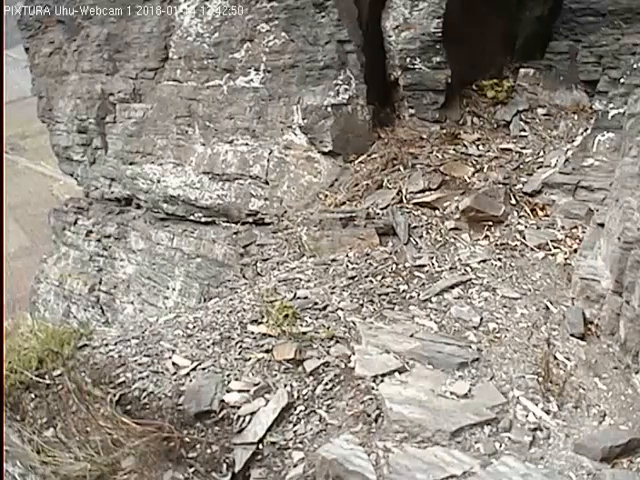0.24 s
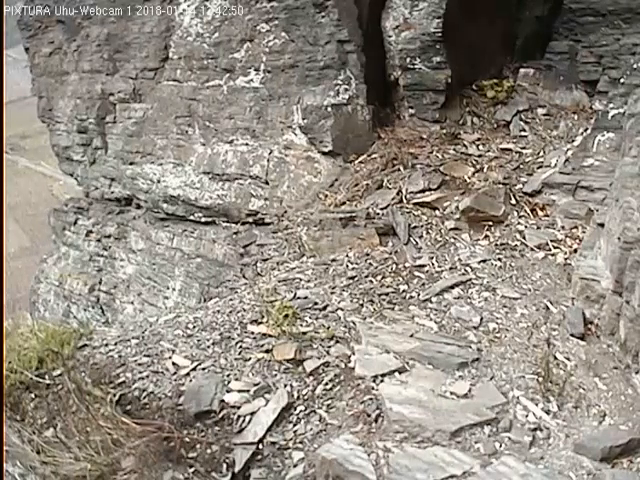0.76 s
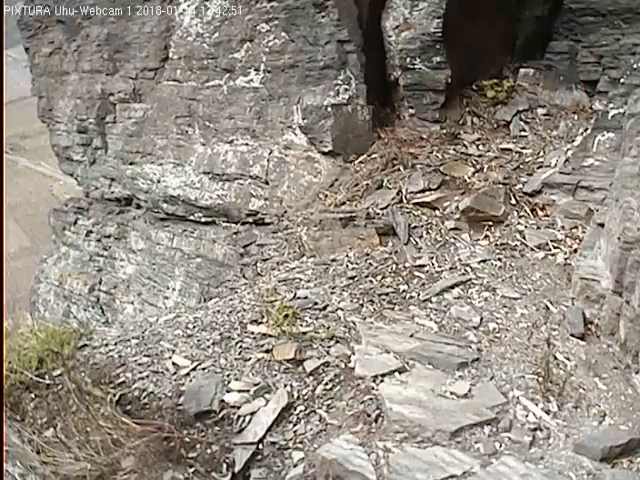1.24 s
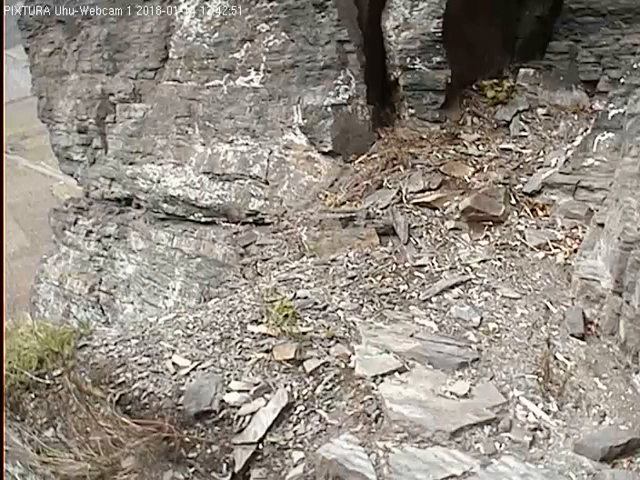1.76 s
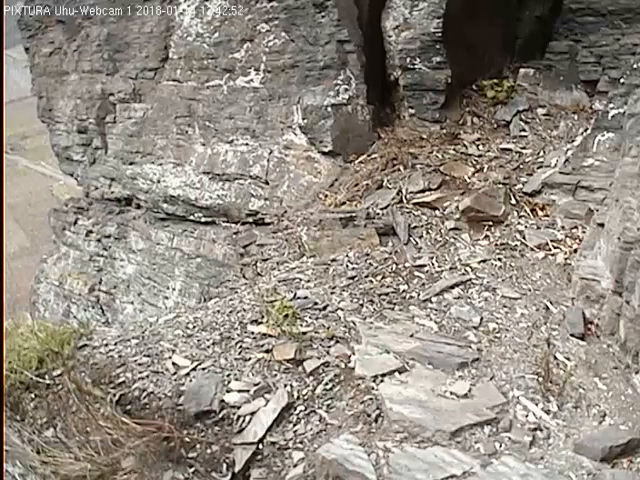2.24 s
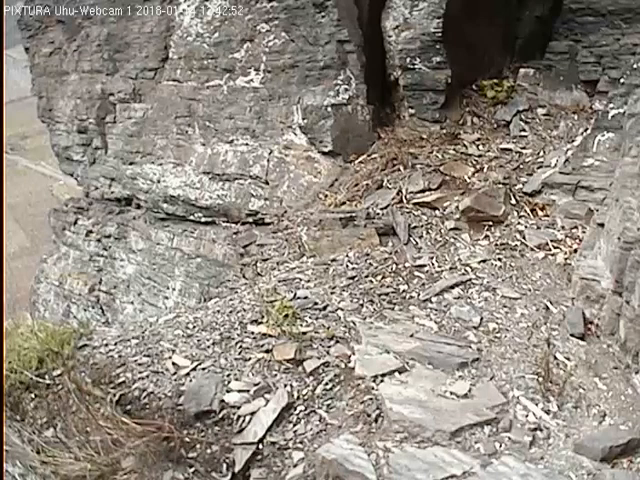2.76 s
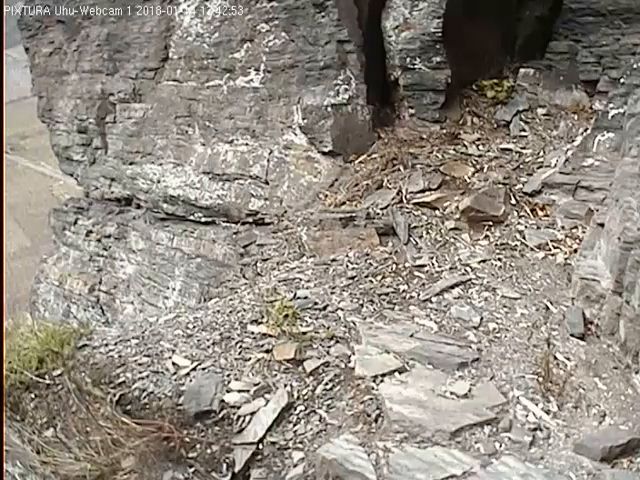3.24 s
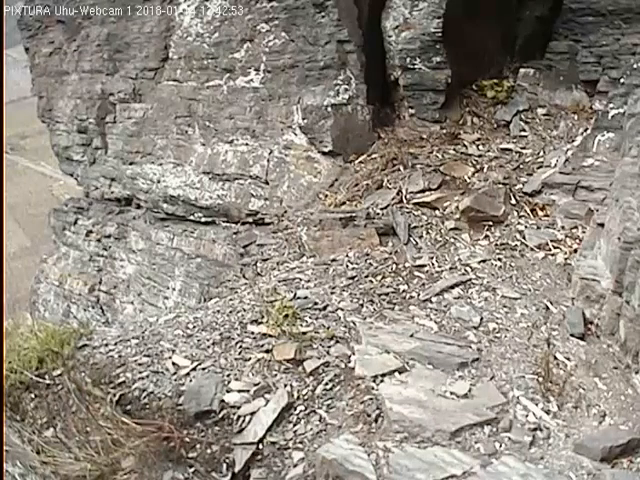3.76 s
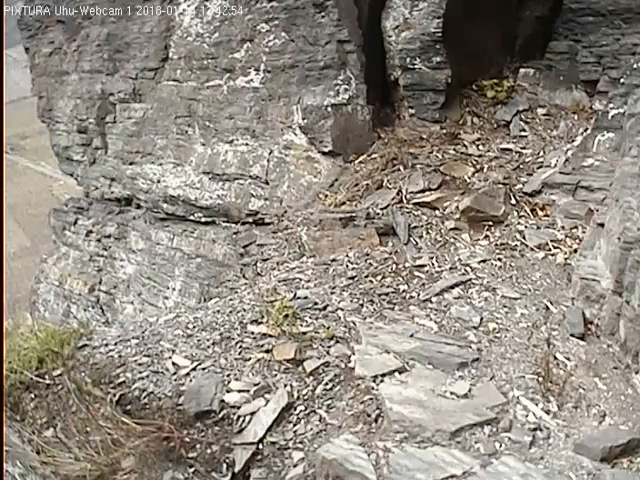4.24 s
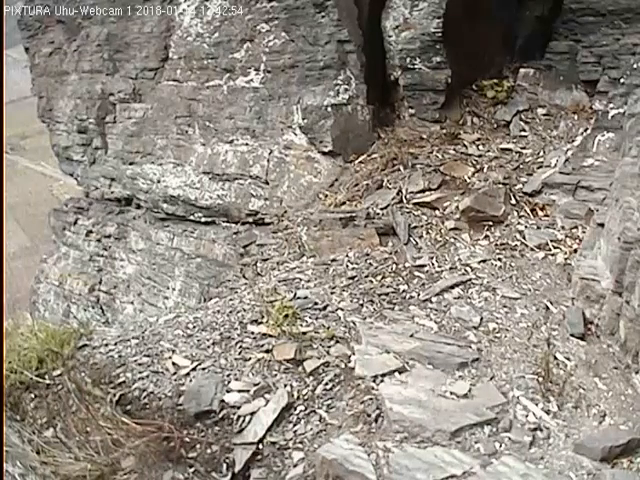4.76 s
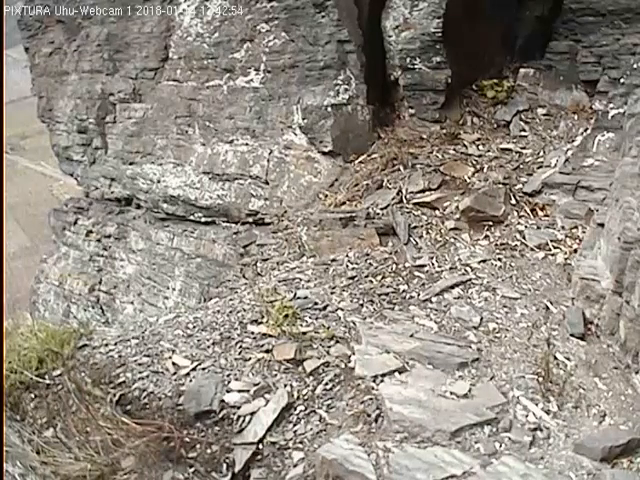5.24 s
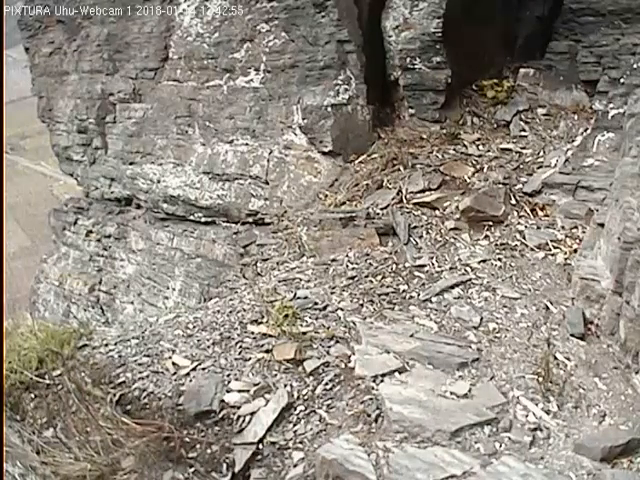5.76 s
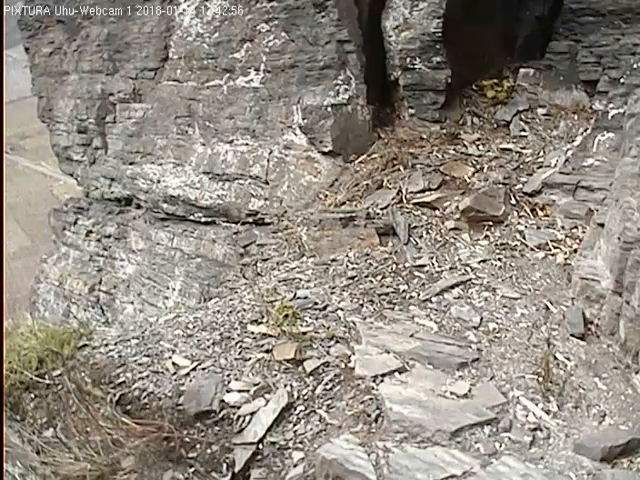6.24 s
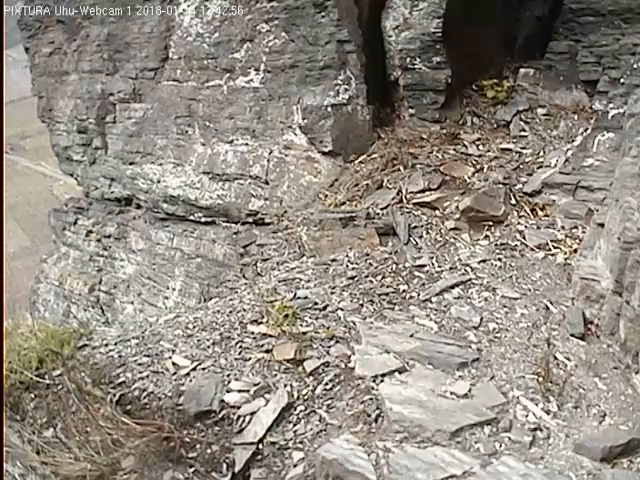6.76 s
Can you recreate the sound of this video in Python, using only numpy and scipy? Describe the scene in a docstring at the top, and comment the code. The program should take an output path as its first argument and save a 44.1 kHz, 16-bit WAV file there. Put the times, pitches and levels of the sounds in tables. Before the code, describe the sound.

A falcon gives ten harsh, rasping alarm cries beside a cliff, swelling to a loud middle then fading, over faint valley rumble and breeze.

```python
"""Ten harsh falcon alarm cries ring out by a cliff ledge, swelling and fading, each building to a last push.
Each call is a whistle near 1.1 kHz, usually strongest in its octave, with sum and difference tones
from a slower flutter of the syrinx and noise for the rasping air.
Filtered, delayed echoes come off the rock, sooner and higher in pitch as the bird flies towards it.
Shaped noise makes the valley's rumble, breeze and gust; a camera adds hum and a thin digital edge."""
import sys
import numpy as np
from scipy import signal
from scipy.fft import rfft, irfft, next_fast_len
from scipy.io import wavfile
from scipy.ndimage import map_coordinates

SR = 44100
rng = np.random.default_rng(int(sys.argv[2]) if len(sys.argv) > 2 else 0)


def unload_wav(signal):
    """Save mono or channel-first audio to the path in sys.argv[1] as 16-bit WAV at rate SR, clipped to [-1, 1]."""
    wavfile.write(
        sys.argv[1],
        SR,
        np.round(np.clip(np.atleast_2d(signal).T, -1, 1) * 32767).astype(np.int16),
    )


N = 308743
T = np.arange(N) / SR  # time line [s]


def from_db(db):
    """Decibels to gain."""
    return 10 ** (np.asarray(db) / 20)


def rms_one(x):
    """Scale to unit power."""
    return x / np.sqrt(np.mean(x ** 2) + 1e-20)


def in_time(rows, t):
    """Read each column of a curve table at the times t."""
    s, *columns = np.transpose(rows)
    return [np.interp(t, s, column) for column in columns]


def bumps(rows, t):
    """Sum of bell-shaped swells given as (centre [s], half length to 1/e [s], height)."""
    return sum(height * np.exp(-((t - s) / width) ** 2) for s, width, height in rows)


def coloured_noise(spectrum, size):
    """Noise of unit power whose spectrum follows points of (frequency [Hz], relative level [dB])."""
    hz, db = np.transpose(spectrum)
    padded = next_fast_len(size, True)
    bins = np.fft.rfftfreq(padded, 1 / SR) + 1e-3
    gain = from_db(np.interp(np.log(bins), np.log(hz), db, left=-120, right=-120))
    noise = irfft(rfft(rng.standard_normal(padded)) * gain, padded)
    return rms_one(noise[:size])


def drift(rate_hz, size):
    """Smooth random wander of spread 1: low-passed noise drawn at every 20th sample."""
    r = np.exp(-2 * np.pi * rate_hz * 20 / SR)
    noise = rng.standard_normal(size // 20 + 2002)
    slow = signal.lfilter([1], [1, -2 * r, r * r], noise)[2000:]  # drop the filter's start-up
    return np.interp(np.arange(size) / 20, np.arange(len(slow)), rms_one(slow))


def cycles(hz):
    """Running phase of an oscillator [radians]."""
    return 2 * np.pi * np.cumsum(hz) / SR


def valley():
    """Steady distant rumble and hiss: noise weighted towards the bass."""
    # Valley and microphone colour: (frequency [Hz], relative level [dB])
    valley_colour = [(22, -54.5), (48, 1.5), (75, -7), (115, -9), (200, -11), (330, -10), (450, -6.5),
                     (560, -18), (950, -12), (1500, -18), (3100, -34), (5000, -29), (8000, -31.5),
                     (8900, -108)]
    return from_db(-53) * coloured_noise(valley_colour, N)


def breeze():
    """Air moving along the cliff: mid-range noise that rises and sinks."""
    # Breeze strength: (time [s], level [dB])
    breeze_level = [(0, -57.5), (1.5, -53), (4, -52), (4.9, -54), (5.6, -59.5), (7, -61.5)]
    # Breeze colour: (frequency [Hz], relative level [dB])
    breeze_colour = [(200, -14), (450, 1), (1000, 4), (1600, 2.5), (2400, 0.5), (4000, -10), (8000, -25)]
    return from_db(in_time(breeze_level, T)[0]) * coloured_noise(breeze_colour, N)


def gust():
    """A soft gust on the microphone: a low thrum of noise."""
    # Gust strength: (time [s], level [dB])
    gust_level = [(0, -74), (4.85, -60.5), (5.05, -57), (5.3, -54.5), (5.55, -62), (7, -78)]
    # Gust colour: (frequency [Hz], relative level [dB])
    gust_colour = [(30, -14), (52, 12.5), (68, 19), (100, -11.5)]
    return from_db(in_time(gust_level, T)[0]) * coloured_noise(gust_colour, N)


def hum(waver_db=1.0, waver_hz=0.26):
    """Mains hum: sine lines that waver slightly in level and pitch under one shared swell."""
    # Hum lines: (frequency [Hz], level [dB])
    hum_lines = [(50, -69), (99.5, -62.5), (149.8, -57.5), (250, -73.5)]
    # Shared swell, used about its mean: (time [s], level [dB])
    hum_swell = [(0, -56), (1, -53.5), (1.21, -62), (1.5, -54), (4.5, -54.5), (5.15, -57), (5.7, -54),
                 (7, -52)]
    swell, = in_time(hum_swell, T)
    swell = swell - swell.mean()
    out = np.zeros(N)
    for hz, db in hum_lines:
        gain = from_db(db + swell + waver_db * drift(4.0, N))
        out += np.sqrt(2) * gain * np.sin(cycles(hz + waver_hz * drift(2.01, N)))
    return out


def crevice(x, ring_hz=2240, width_hz=280, ring_t60=0.61, ring_db=-29):
    """Hollows near the microphone ring on faintly and unevenly: band-passed, decaying noise response."""
    edges = [ring_hz - width_hz / 2, ring_hz + width_hz / 2]
    band = signal.butter(2, edges, "band", fs=SR, output="sos")
    decay = from_db(-60 * T[:SR] / ring_t60)
    answer = rms_one(rng.standard_normal(SR) * decay) / np.sqrt(SR)
    return from_db(ring_db) * signal.fftconvolve(x, signal.sosfilt(band, answer))[:N]


def cliff(bird, scatter_s=0.0027, tail_t60=1.0, tail_db=0, dull_hz=2300, slip_rad=1.1, slip_hz=35):
    """Broken rock returns smeared echoes and a thin dull tail; a shrinking delay raises their pitch."""
    # Echo send: (time [s], level [dB])
    echo_share = [(0, -5), (1.4, -29), (3.8, -29.5), (4.35, -25.5), (4.8, -17), (5.2, -11.5), (5.6, -7.5),
                  (7, -8)]
    # Way round by the rock, shrinking as the bird flies at it: (time [s], delay [s])
    cliff_delay = [(0, .12), (4.32, .12), (5.9, .024), (7, .024)]
    # Separate reflections: (delay after the first [s], level [dB])
    echoes = [(0, 4.5), (.034, 2), (.06, -3), (.1, -6), (.14, -11)]
    sent = bird * from_db(in_time(echo_share, T)[0])
    delayed = map_coordinates(sent, [(T - in_time(cliff_delay, T)[0]) * SR], order=3)
    # the bird's motion over broken rock scatters the phase
    analytic = signal.hilbert(delayed, next_fast_len(N))[:N]
    scattered = np.real(analytic * np.exp(1j * slip_rad * drift(slip_hz, N)))
    t = T[:SR]
    power = from_db(2 * tail_db) * rms_one(from_db(-60 * t / tail_t60)) ** 2
    for delay, db in echoes:
        smear = np.exp(-abs(t - delay) / scatter_s) * (t >= delay)
        power = power + from_db(2 * db) * rms_one(smear) ** 2
    answer = np.sqrt(power / SR) * rng.standard_normal(SR)
    answer = signal.sosfilt(signal.butter(1, dull_hz, fs=SR, output="sos"), answer)
    return signal.fftconvolve(scattered, answer)[:N]


def digital_edge(x, edge_db=-17, camera_rate=32000):
    """A crude sample-rate change in the camera: the calls' 1.9-2.6 kHz band mirrored about 12.1 kHz."""
    band = signal.sosfilt(signal.butter(3, [1900, 2600], "band", fs=SR, output="sos"), x)
    return from_db(edge_db) * band * np.cos(2 * np.pi * (SR - camera_rate) * T)


def peeps():
    """Brief pure notes between cries: sines in bell-shaped envelopes."""
    # Peeps: (time [s], frequency [Hz], peak level [dB], half length to 1/e [s])
    peep_notes = [(4.499, 2210, -34.5, 0.0027)]
    return sum(from_db(db) * bumps([(s, length, 1)], T) * np.sin(2 * np.pi * hz * T)
               for s, hz, db, length in peep_notes)


def effort(t, length, crescendo_db, attack_s=0.032, attack_db=10.5, release_s=0.039, release_db=11):
    """The bird's drive: attack, steady crescendo and release, in dB below the top."""
    opening = np.clip(1 - t / attack_s, 0, 1)
    closing = np.clip(1 - (length - t) / release_s, 0, 1)
    return -crescendo_db * (1 - t / length) - attack_db * opening - release_db * closing


def squeal_db(harmonic, t):
    """The throat tunes in on one harmonic, which rings out, or mutes it."""
    # Squeals: (time [s], half length to 1/e [s], harmonic, lift [dB])
    squeals = [(0.253, 0.087, 4, 12), (0.524, 0.03, 3, 10.5), (0.632, 0.05, 3, 8), (1.09, 0.06, 4, 5.5),
               (1.43, .03, 4, -4), (2.8, .03, 4, -4), (3.82, .05, 4, -5), (4.35, .025, 4, -4),
               (1.256, 0.073, 3, 10), (2.02, 0.031, 3, 3.5), (2.66, 0.046, 3, 8.5), (2.02, 0.09, 4, 6),
               (3.056, 0.059, 3, 9), (3.058, 0.026, 4, 11), (3.26, 0.027, 3, 4.5), (3.545, 0.033, 4, 12),
               (3.704, 0.044, 3, 8.5), (3.83, 0.025, 3, 2.5), (4.23, .025, 3, 7.5), (4.353, 0.018, 3, 8),
               (4.394, .012, 4, 15), (4.545, .015, 4, 12), (4.666, 0.015, 3, 9), (4.806, 0.02, 3, 14),
               (4.81, 0.026, 6, 10.5), (4.832, 0.011, 4, 15), (5.198, 0.02, 3, 9), (5.5, .04, 3, 4),
               (5.2, .012, 5, 11), (5.205, 0.027, 6, 11), (5.212, .008, 4, 13), (5.587, 0.025, 4, 6.5),
               (5.584, 0.029, 5, 11.5)]
    return bumps([(s, width, db) for s, width, k, db in squeals if round(k) == harmonic], t)


def swell_db(harmonic, steps, t):
    """One tone of the flutter stands out or sinks for a moment."""
    # Swells: (time [s], half length to 1/e [s], harmonic, flutter steps away, lift [dB])
    flutter_swells = [(.29, 0.075, 2, 1, 7.5), (1.11, .025, 2, 1, -9), (1.2, .05, 2, 1, 7),
                      (1.84, 0.13, 2, 1, 3.5), (1.88, .1, 1, 1, 8.5), (2.11, 0.046, 2, 1, -10),
                      (2.183, .025, 2, 1, 4.5), (2.03, 0.097, 4, -1, 6), (2.1, .04, 3, 1, 6),
                      (1.967, .08, 3, -1, -2), (2.47, .07, 2, 1, 4.5), (2.67, .06, 1, 1, 7),
                      (3.027, 0.021, 2, 1, -3), (3.06, .04, 3, -1, 5), (3.15, .03, 2, 1, -7),
                      (3.173, 0.049, 3, -1, 8), (3.21, .025, 2, 1, 3), (3.27, .025, 2, 1, -7),
                      (3.63, 0.031, 2, 1, 2), (3.783, 0.046, 3, -1, 4.5), (3.822, 0.036, 2, -1, 7),
                      (3.86, .03, 2, 1, -2), (4.05, 0.046, 2, -1, 12), (4.229, 0.035, 2, 1, 6.5),
                      (4.243, 0.04, 3, -1, 12), (4.3, .025, 2, -1, 8), (4.352, 0.017, 2, 1, 4),
                      (4.66, .02, 2, 1, 7), (4.686, 0.046, 2, -1, 16.5), (4.7, .04, 3, -1, 7),
                      (4.77, 0.023, 2, 1, 5), (5.09, .06, 2, 1, 2.5), (5.08, .05, 3, -1, 7),
                      (5.07, 0.052, 4, -1, 8)]
    return bumps([(s, width, db) for s, width, k, step, db in flutter_swells
                  if (round(k), round(step)) == (harmonic, steps)], t)


def partial(db, phase, hoarse, flicker_db=3.2, slip_rad=0.48, rate_hz=140):
    """One tone of the voice; hoarseness shakes its strength and phase into a grainy band."""
    size = len(phase)
    grain = rms_one(from_db(flicker_db * hoarse * drift(rate_hz, size)))
    slip = slip_rad * hoarse * drift(rate_hz, size)
    return np.sqrt(2) * from_db(db) * grain * np.sin(phase + slip)


def upper_harmonics(upper_db, phase, hoarse, t, top_blur=0.12):
    """Harmonics from the fourth up, shimmering in level and blurring more with each step."""
    # Upper harmonics: (multiple of the pitch, relative level [dB])
    overtones = [(4, -4.5), (5, -10), (6, -13), (7, -18), (8, -17.5), (9, -13)]
    out = np.zeros(len(t))
    for k, db in overtones:
        tone_db = upper_db + db + squeal_db(round(k), t) + 3.0 * drift(27, len(t))
        out += partial(tone_db, round(k) * phase, hoarse + top_blur * (k - overtones[0][0]))
    return out


def flutter_tones(side_db, phase, flutter, hoarse, t):
    """The slow vibration modulates the fast one: sum and difference tones, loosely locked in phase."""
    # Side tones: (harmonic, flutter steps away, relative level [dB])
    side_tones = [(1, 1, -12.5), (1, -1, -23.5), (2, -2, -27), (2, -1, -11), (2, 1, 1.5), (2, 2, -15),
                  (3, -2, -13), (3, -1, -5.5), (3, 1, -11), (4, -2, -16.5), (4, -1, -9), (5, -1, -21.5),
                  (5, 1, -22), (6, -1, -27)]
    out = np.zeros(len(t))
    for k, step, db in side_tones:
        slip = rng.uniform(0, 2 * np.pi) + 0.52 * drift(29, len(t))
        tone_db = side_db + db + swell_db(round(k), round(step), t) + 3.0 * drift(28, len(t))
        out += partial(tone_db, round(k) * phase + round(step) * flutter + slip, hoarse)
    return out


def torn_voice(base_db, phase, flutter, torn):
    """In croaks the flutter doubles its period, which fills the gaps between the lines."""
    # Torn tones: (harmonic, half flutter steps away, rounded when used, level against the rasp [dB])
    torn_tones = [(2, -1, 0.5), (2, 0, 2), (2, 4, 1), (3, -5, -7.5), (3, -1, 1.5), (4, -2.5, -6.5)]
    out = np.zeros(len(phase))
    for k, step, db in torn_tones:
        angle = round(k) * phase + round(step) * flutter / 2 + rng.uniform(0, 2 * np.pi)
        out += torn * partial(base_db + db, angle, torn)
    return out


def rasping_air(air_db, flutter):
    """Noise coloured by the throat: air escapes in puffs, in time with the flutter."""
    # Throat colour: (frequency [Hz], relative level [dB])
    throat = [(600, -37), (1100, 0), (1550, -32), (1880, 12), (2300, 10), (2700, -13), (3150, 6),
              (3700, -2.5), (4200, -2), (4800, -7.5), (6500, -9), (8000, -16), (9500, -4.5), (11000, -88.5)]
    puffs = 1 + 0.2 * np.cos(flutter)
    return from_db(air_db) * coloured_noise(throat, len(flutter)) * puffs


def call(cry, fundamental_level, octave_level, syrinx):
    """One cry: two coupled vibrations of the syrinx, driven by effort, unsteadier as more air rasps."""
    # Croaks, where harmonics give way to rasp: (time [s], half length to 1/e [s], extra rasp [dB])
    croaks = [(.697, 0.018, 23), (1.433, 0.025, 12.5), (2.235, 0.027, 9.5), (2.49, .03, 3),
              (2.745, 0.019, 4.5), (2.828, 0.02, 6.5), (3.02, 0.029, 6.5), (3.09, 0.028, 5.5),
              (3.358, 0.03, 8.5), (3.535, 0.014, 5), (3.62, 0.011, 2), (3.675, 0.015, 5.5),
              (3.82, 0.031, 2), (3.882, 0.019, 5), (4.09, 0.045, 4), (4.225, .025, 2), (4.27, .018, 4),
              (4.393, 0.011, 14), (4.71, 0.022, 4.5), (4.765, 0.017, 2), (4.826, 0.018, 5.5),
              (5.222, 0.011, 7.5), (5.555, 0.018, 3.5)]
    # Instants where the voice catches: (time [s], half length to 1/e [s], level change [dB])
    catches = [(1.402, 0.0045, -4), (3.0, 0.0037, 0), (3.34, 0.0042, -1.5), (3.585, 0.015, -3.5),
               (3.735, 0.026, -1.5), (3.811, 0.0038, -6.5), (3.849, 0.0016, -9), (4.147, 0.013, -6),
               (4.305, 0.031, -2.5)]
    # Hoarseness over the run of cries: (time [s], amount [0-1])
    hoarseness = [(0, .3), (1.8, .1), (3, .4), (3.6, .5), (4.2, .6), (4.6, .7), (5, 1)]
    start, end, level_db, crescendo_db, upper_rel_db, flutter_rel_db, rasp_rel_db, push_s, push_db, yelp = cry
    at = np.flatnonzero((T >= start) & (T <= end))
    t, size = T[at], len(at)

    push_lift_db = push_db * bumps([(push_s, 0.032, 1)], t)
    croak_db = bumps(croaks, t)
    effort_db = effort(t - start, end - start, crescendo_db) + push_lift_db
    harmonic_loss_db = 0.38 * croak_db

    low_db = in_time(fundamental_level, t)[0] - 1 + 2 * drift(23, size)
    octave_db = in_time(octave_level, t)[0] - 1 - 0.064 * croak_db + 2.03 * drift(42, size)
    third_db = level_db - 1 + effort_db + squeal_db(3, t) - harmonic_loss_db
    # the other parts follow the effort a little less than fully
    upper_db = level_db + upper_rel_db + 0.94 * effort_db - harmonic_loss_db
    flutter_db = level_db + flutter_rel_db + 0.8 * effort_db + 0.12 * croak_db
    rasp_db = level_db + rasp_rel_db + 0.9 * (effort_db - push_lift_db / 2) + croak_db

    # the last 0.11 s may clear into a yelp: steadier, brighter, with less flutter and rasp
    clear = np.clip(yelp, 0, 1) * np.clip(2 * (1 - (t[-1] - t) / 0.11), 0, 1)
    yelp_cut_db, yelp_bright_db = -6 * clear, 5 * clear
    rough = np.clip(from_db(rasp_db - octave_db + 6.5), 0, 1) * (1 - clear)
    torn = np.clip(croak_db / 6, 0, 1)
    hoarse = np.maximum(in_time(hoarseness, t)[0], torn) * (1 - clear)

    # slow waver of the pitch, then fast jitter of both vibrations, as shares of their rates
    pitch, flutter_hz = in_time(syrinx, t)
    pitch = pitch * (1 + 0.00315 * drift(13.3, size))
    pitch_jitter = 0.003 + 0.013 * rough * np.sqrt(hoarse) + 0.016 * torn * (1 - clear)
    flutter_jitter = 0.022 * (0.23 + rough * hoarse + torn)
    phase = cycles(pitch * (1 + pitch_jitter * drift(170, size)))
    flutter = cycles(flutter_hz * (1 + flutter_jitter * drift(62, size)))

    voice = partial(low_db, phase, hoarse * rough)
    voice += partial(octave_db, 2 * phase, hoarse * rough)
    voice += partial(third_db + 3.0 * drift(51, size), 3 * phase, hoarse)
    voice += upper_harmonics(upper_db + yelp_bright_db, phase, hoarse, t)
    voice += flutter_tones(flutter_db - 2.5 + yelp_cut_db, phase, flutter, hoarse, t)
    voice += torn_voice(rasp_db + yelp_cut_db, phase, flutter, torn)
    rasp = rasping_air(rasp_db + 4.8 + yelp_cut_db, flutter)

    edges = np.clip(np.minimum(t - t[0], t[-1] - t) / 0.0043, 0, 1)  # 4.3 ms fades
    out = np.zeros(N)
    out[at] = (voice + rasp) * from_db(bumps(catches, t)) * edges
    return out


def scene():
    """Bird, echoes and background reach one microphone, heard alike on both channels."""
    # Cries: (start [s], end [s], base level [dB], crescendo [dB],
    #   upper harmonics, flutter, rasp [dB against the base level, before trims in call],
    #   time of the final push [s], push strength [dB], clearness of the closing yelp [0-1])
    cries = [ (0.073, 0.731, -61.5, 9, -4.5, 1.5, -17.5, .655, 4.5, 0.03),
             (0.87, 1.491, -58.5, 7.3, 0, 2.3, -16, 1.428, 7.5, 0.036),
             (1.647, 2.268, -44, 16.3, -7.5, 0.5, -10, 2.2, 0.5, 0.6),
             (2.395, 2.855, -48.5, 15.2, -3, 6.5, -4, 2.8, 3.5, 0.026),
             (2.999, 3.393, -41.5, 10.3, -5.5, 3.4, -10, 3.34, 1, 0.12),
             (3.514, 3.902, -39, 11.7, -5.5, 3.8, -7, 3.83, 2, 0.31),
             (4.011, 4.409, -42, 8.9, -8, 1.7, -7, 4.35, 5, 0.75),
             (4.521, 4.859, -49.5, 6.6, -7.5, 2.3, -5, 4.81, 7, 0.76),
             (4.971, 5.255, -52, 8.2, -10, 1.4, -3.5, 5.205, 1, 0.47),
             (5.454, 5.661, -57.5, 9.8, -4.5, 3, -1, 5.598, 7, 0.79), ]
    # Fundamental, one curve a cry: (time [s], level before a 1 dB cut [dB])
    fundamental_levels = [
        [(0.07, -73), (0.118, -59), (0.242, -55), (0.468, -64), (0.48, -68), (0.612, -63), (0.666, -48),
         (0.73, -63)],
        [(0.87, -60), (1.124, -52.5), (1.234, -67), (1.298, -65), (1.378, -64), (1.422, -46), (1.472, -56),
         (1.49, -60)],
        [(1.645, -57), (1.819, -50.5), (2.031, -51), (2.045, -62), (2.097, -47.5), (2.201, -60), (2.227, -56),
         (2.27, -58)],
        [(2.4, -55), (2.446, -51), (2.602, -50), (2.632, -45), (2.668, -47.5), (2.716, -41), (2.816, -41.5),
         (2.85, -61)],
        [(3.0, -57), (3.04, -49), (3.16, -51), (3.2, -41.5), (3.264, -43), (3.32, -36), (3.364, -44),
         (3.39, -56)],
        [(3.51, -63), (3.548, -46.5), (3.726, -47), (3.746, -40), (3.806, -46), (3.854, -60), (3.884, -47),
         (3.9, -57)],
        [(4.01, -57), (4.076, -47), (4.15, -48.5), (4.228, -41.5), (4.28, -52), (4.306, -39), (4.392, -53),
         (4.41, -61)],
        [(4.52, -58), (4.586, -54), (4.632, -47.5), (4.666, -58), (4.7, -58), (4.788, -54), (4.82, -56),
         (4.856, -66)],
        [(4.97, -67), (4.98, -64), (5.05, -55.5), (5.158, -61), (5.228, -55), (5.25, -65)],
        [(5.46, -71), (5.468, -67), (5.492, -66), (5.53, -59), (5.568, -77), (5.612, -70), (5.632, -74),
         (5.65, -75)],
    ]
    # Octave, one curve a cry: (time [s], level before a 1 dB cut [dB])
    octave_levels = [
        [(0.07, -62), (0.12, -61), (0.21, -50.5), (0.26, -60), (0.31, -56), (0.378, -61), (0.43, -46),
         (0.458, -74), (0.484, -42), (0.522, -66.5), (0.704, -45), (0.716, -58), (0.728, -50)],
        [(0.87, -57), (0.946, -56), (0.972, -59), (1.026, -46), (1.11, -50.5), (1.162, -37.5), (1.4, -43.5),
         (1.411, -32.5), (1.444, -32), (1.475, -58)],
        [(1.645, -58), (1.661, -53), (1.867, -41.5), (2.059, -49.5), (2.083, -34.5), (2.137, -47), (2.157, -32),
         (2.179, -30.5), (2.227, -35.5), (2.27, -52)],
        [(2.415, -51), (2.435, -54), (2.465, -44), (2.49, -53), (2.575, -40), (2.595, -53), (2.62, -32),
         (2.656, -37), (2.666, -41), (2.802, -30.5), (2.826, -32.5), (2.855, -52)],
        [(2.998, -57), (3.012, -44), (3.04, -41.5), (3.1, -40), (3.14, -36.5), (3.19, -27.5), (3.346, -30.5),
         (3.358, -27), (3.382, -50), (3.395, -52)],
        [(3.507, -58), (3.537, -42), (3.687, -37.5), (3.729, -54.5), (3.775, -27.5), (3.831, -19),
         (3.873, -30.5), (3.9, -70)],
        [(4.012, -46.5), (4.05, -50.5), (4.1, -35.5), (4.136, -43), (4.148, -48.5), (4.216, -34),
         (4.298, -38.5), (4.346, -24.5), (4.39, -38.5), (4.408, -57)],
        [(4.52, -49), (4.546, -56), (4.6, -39), (4.674, -34.5), (4.692, -46.5), (4.785, -37.5), (4.81, -45),
         (4.838, -56), (4.85, -47)],
        [(4.97, -56), (4.99, -63), (5.028, -62), (5.05, -50.5), (5.078, -46), (5.128, -51.5), (5.186, -35.5),
         (5.21, -52), (5.245, -66)],
        [(5.46, -61), (5.478, -61), (5.526, -57.5), (5.56, -54), (5.6, -48.5), (5.617, -42), (5.64, -69)],
    ]
    # Two vibrations of the syrinx, one curve a cry: (time [s], pitch [Hz], flutter rate [Hz])
    syrinx_curves = [
        [(.07, 990, 258), (.2, 1012, 263.3), (.3, 1052, 279), (.42, 1085, 295), (.48, 1080, 333.5),
         (.52, 1112, 353), (.68, 1150, 324), (.72, 1115, 307)],
        [(.87, 1010, 256), (.96, 1030, 263), (1.035, 1085, 276), (1.1, 1062, 280), (1.21, 1112, 289.4),
         (1.3, 1106, 301), (1.39, 1118, 317), (1.428, 1160, 326), (1.48, 1110, 325)],
        [(1.645, 1020, 267.5), (1.79, 1062, 299.8), (1.88, 1068, 312.5), (2.0, 1092, 325.5), (2.085, 1126, 331),
         (2.14, 1124, 346), (2.2, 1150, 354), (2.24, 1129, 350), (2.27, 1094, 340)],
        [(2.39, 1015, 278.4), (2.46, 1018, 302), (2.51, 1030, 309.4), (2.55, 1064, 277), (2.64, 1076, 308.4),
         (2.72, 1118, 313.5), (2.795, 1140, 382), (2.82, 1105, 364.4), (2.85, 1000, 350)],
        [(3.0, 1030, 289), (3.04, 1008, 291.2), (3.09, 1020, 266.2), (3.15, 1048, 290.3), (3.21, 1117, 328.3),
         (3.265, 1098, 306), (3.32, 1132, 357), (3.36, 1085, 399), (3.39, 980, 348)],
        [(3.51, 960, 277.6), (3.545, 1022, 287), (3.58, 985, 298), (3.61, 1040, 267), (3.68, 1072, 309),
         (3.72, 1066, 278), (3.77, 1078, 307), (3.825, 1098, 357.4), (3.87, 1082, 414), (3.9, 980, 363)],
        [(4.01, 920, 258), (4.06, 1012, 272), (4.13, 1020, 258.8), (4.19, 1058, 322.7), (4.24, 1068, 325),
         (4.28, 1055, 305), (4.345, 1106, 416), (4.372, 1090, 417), (4.407, 900, 353)],
        [(4.52, 945, 267), (4.59, 985, 299.7), (4.66, 1078, 325), (4.72, 1052, 286.7), (4.788, 1055, 380),
         (4.797, 990, 325), (4.819, 975, 306), (4.825, 931, 295), (4.85, 903, 282)],
        [(4.97, 995, 281), (5.08, 1000, 318.7), (5.15, 1020, 278), (5.185, 995, 323), (5.2, 955, 315),
         (5.225, 935, 290), (5.24, 930, 270)],
        [(5.46, 980, 276), (5.54, 1000, 317.4), (5.58, 968, 297), (5.6, 955, 305), (5.618, 900, 293),
         (5.64, 880, 258)],
    ]
    controls = zip(cries, fundamental_levels, octave_levels, syrinx_curves)
    bird = sum(call(*one_cry) for one_cry in controls) + peeps()
    background = valley() + breeze() + gust() + hum()
    mix = background + crevice(bird) + cliff(bird) + digital_edge(bird) + bird
    return np.tile(mix, (2, 1))


def record(dry):
    """The camera cuts off the top: a steep low-pass, 70 dB down from 16 kHz."""
    return signal.sosfilt(signal.cheby2(14, 70, 16000, fs=SR, output="sos"), dry)


dry = scene()
out = record(dry)
unload_wav(out)
```